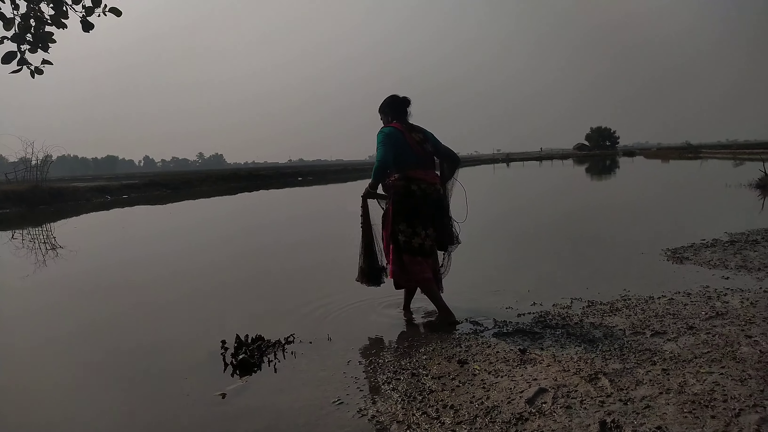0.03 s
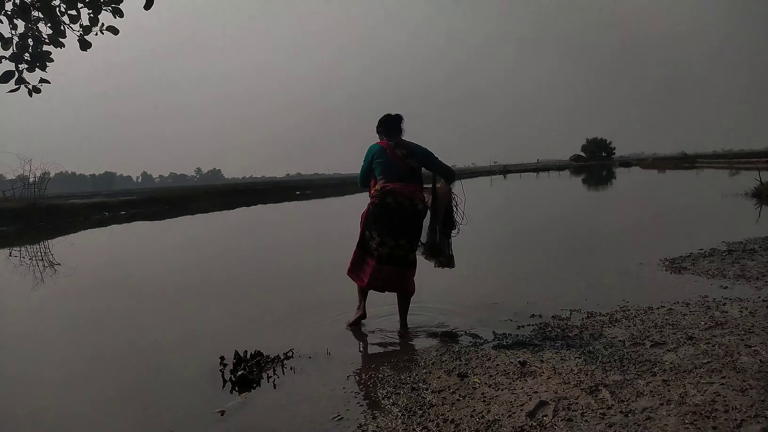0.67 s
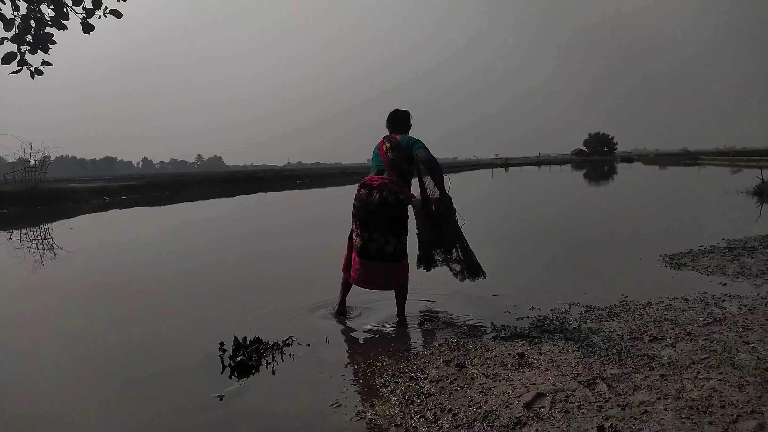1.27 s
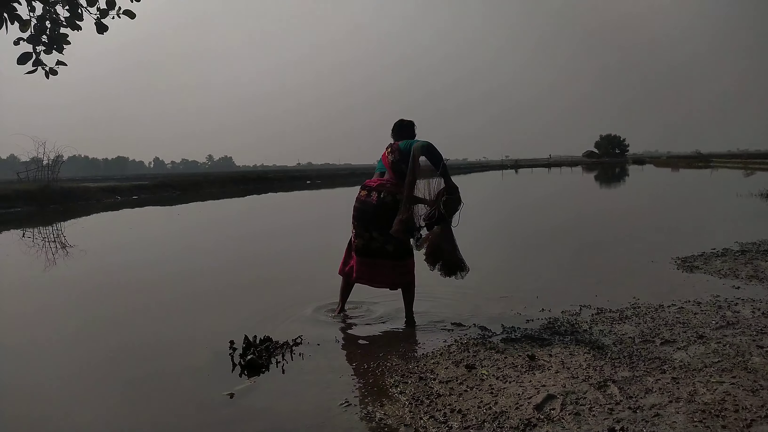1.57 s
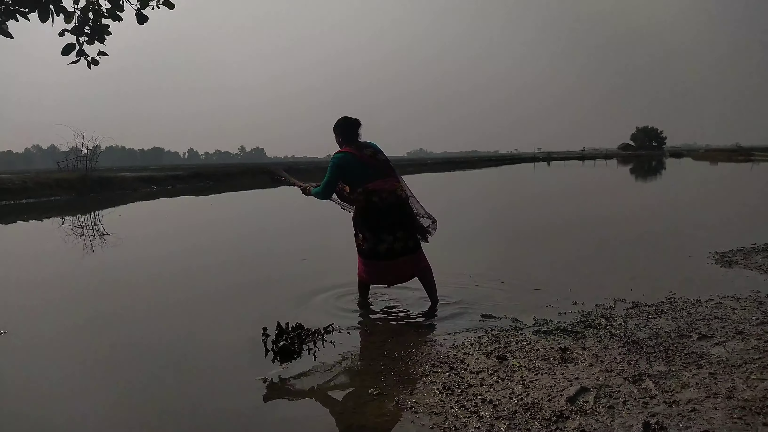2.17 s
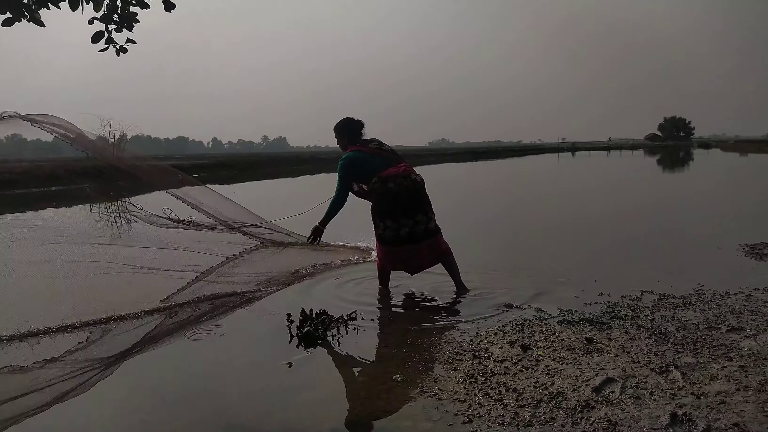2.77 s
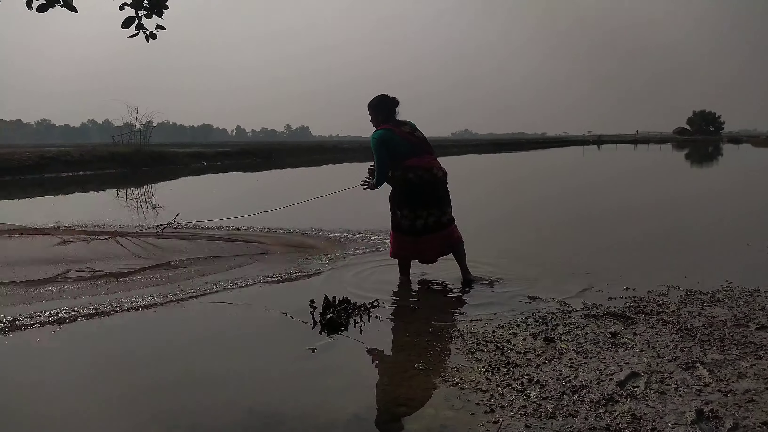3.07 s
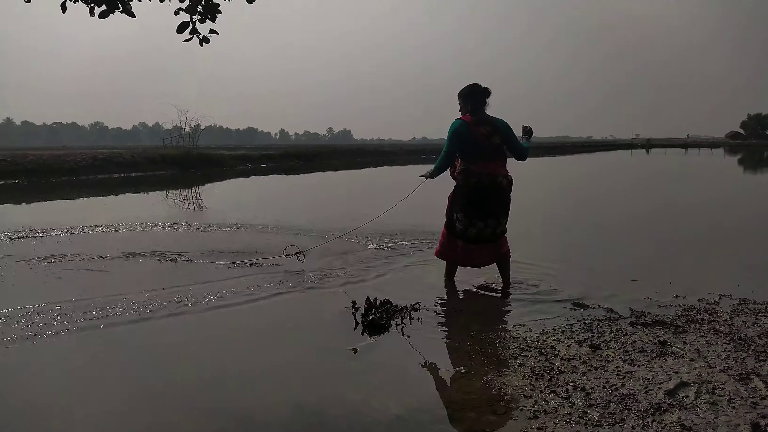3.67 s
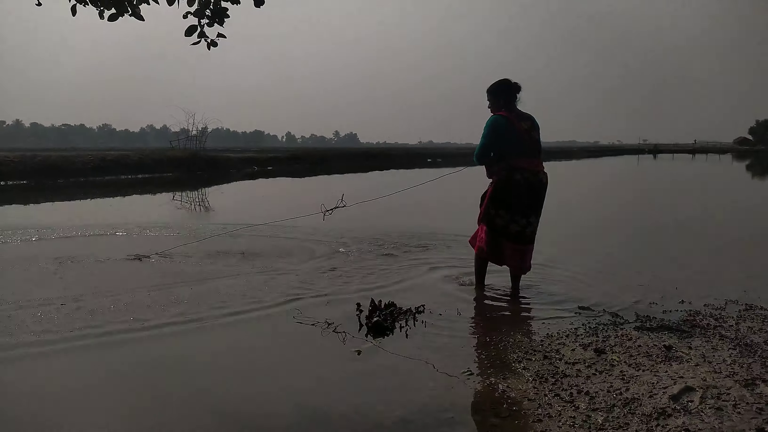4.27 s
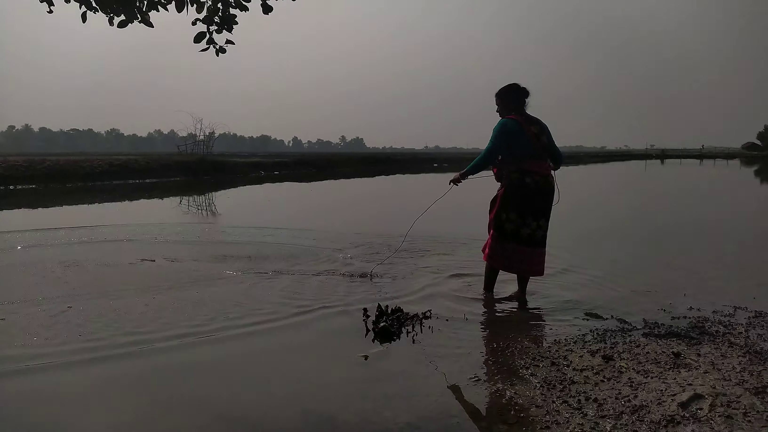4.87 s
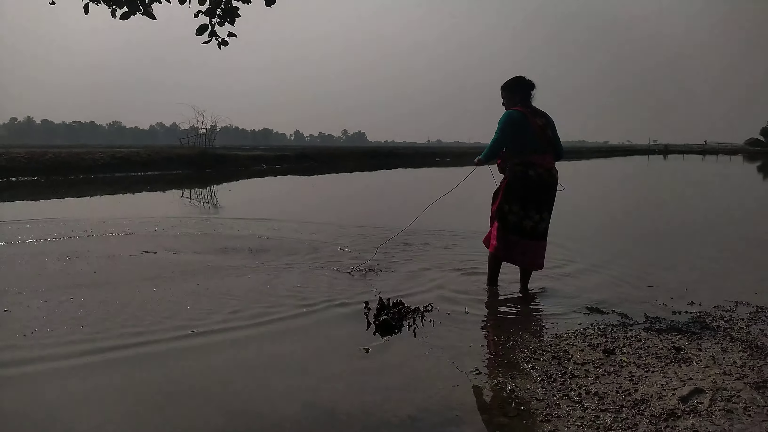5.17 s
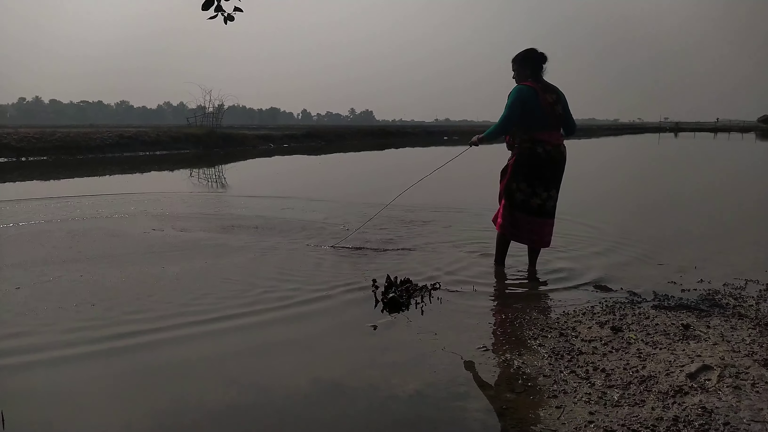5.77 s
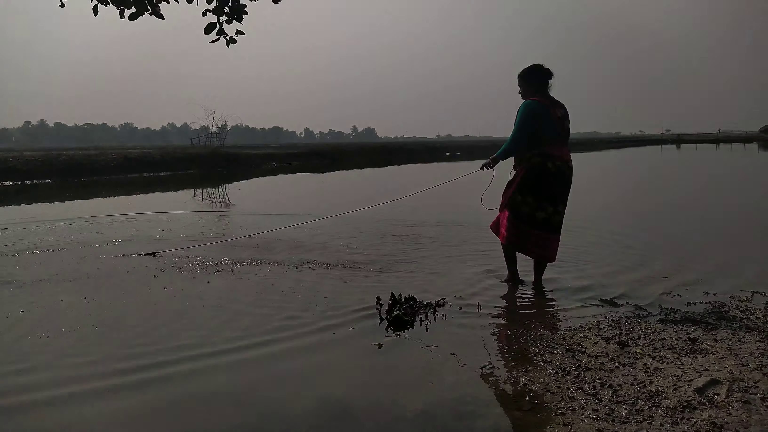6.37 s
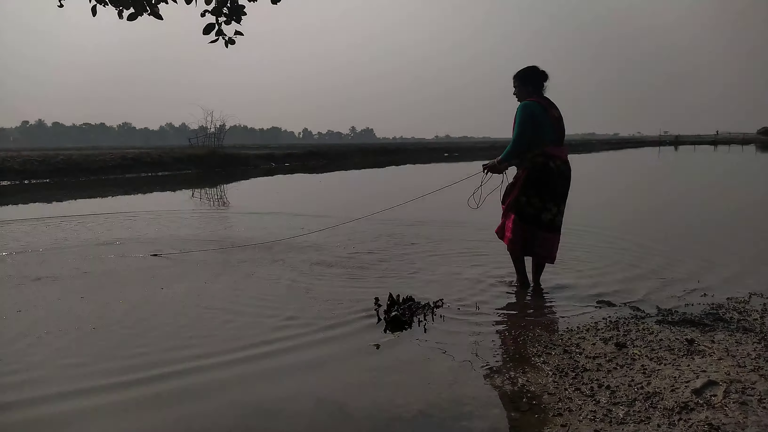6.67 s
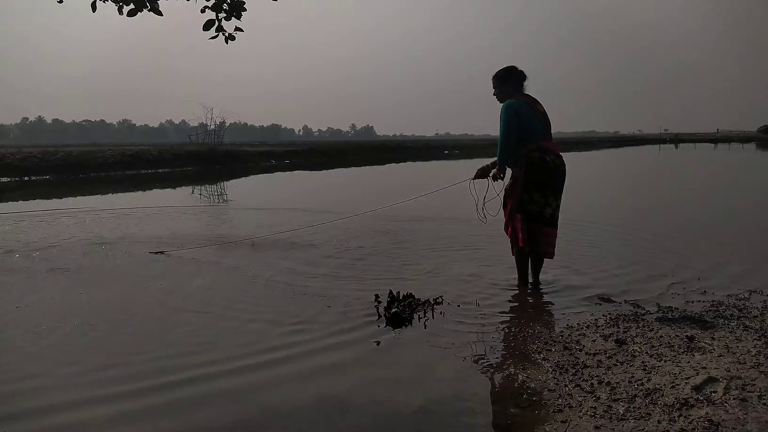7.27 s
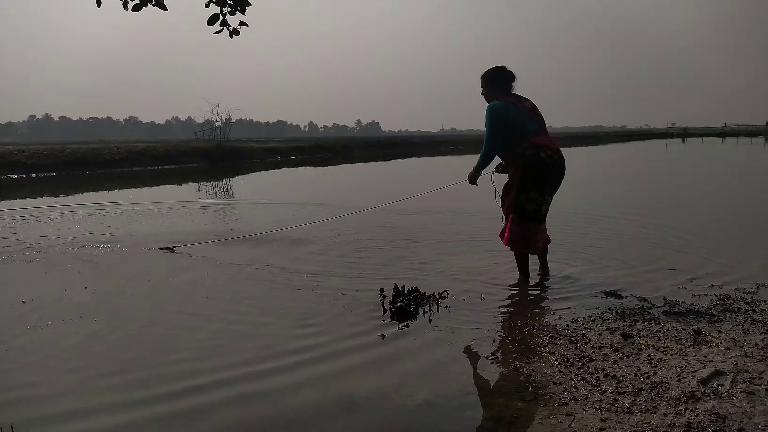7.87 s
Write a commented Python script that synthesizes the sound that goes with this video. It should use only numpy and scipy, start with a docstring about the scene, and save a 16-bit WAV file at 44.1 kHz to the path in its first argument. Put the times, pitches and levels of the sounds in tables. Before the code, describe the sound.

A bird repeats one short, falling chirp close by in quiet open air. Someone wades in the shallows with small plops while a cast net's metal weights clink. The net is swung with a bright clash, then splashes into the river, pattering and gurgling, and leaves a fading fizz. Light drips and flicks of water follow, with faint far whistles and a distant engine. One sharp click sounds close by near the end.

```python
"""A cast net is thrown into a calm river: its metal weights clink as it is gathered and swung, then
rim and mesh patter into the water, punching air pockets, raising spray and leaving a fading fizz.
The fisher wades at the muddy edge, with plops, sucking mud and flicked water. A bird repeats one
falling chirp close by; other birds whistle far off and a distant engine thuds in the open air.
Near the end comes a single sharp, bright click close by."""
import sys
import numpy as np
from scipy import signal
from scipy.fft import rfft, irfft, next_fast_len
from scipy.io import wavfile
from scipy.ndimage import uniform_filter1d

SR = 44100
rng = np.random.default_rng(int(sys.argv[2]) if len(sys.argv) > 2 else 0)


def int16_out(signal):
    """Quantize to a 16-bit WAV file."""
    q = np.round(np.clip(np.atleast_2d(signal).T, -1, 1) * 32767)
    wavfile.write(sys.argv[1], SR, q.astype(np.int16))


N = 358091
TIME = np.arange(N) / SR
LEFT_LAG_S = .000385  # source off to the right
# sound from all around, alike only in the bass: freq_hz, left_right_likeness
AMBIENT_LIKENESS = [(25, -0.2), (60, 1.1), (150, 0.67), (300, 0.6), (640, 0.2), (1400, 0.1), (3000, 0.1),
                    (7000, 0)]


def from_db(db):
    """Decibels to gain."""
    return 10 ** (np.asarray(db) / 20)


def rms_one(x):
    """Scale to rms 1."""
    return x / np.sqrt(np.mean(x ** 2) + 1e-20)


def at_bins(points):
    """Read (freq_hz, value) rows at every FFT bin."""
    hz, value = np.transpose(points)
    bins_hz = np.fft.rfftfreq(next_fast_len(N, True), 1 / SR)
    return np.interp(np.log(bins_hz + 1), np.log(hz), value)


def shaped(x, gains):
    """Apply one gain per FFT bin."""
    size = next_fast_len(N, True)
    return irfft(rfft(x, size) * gains, size)[..., :N]


def coloured(x, spectrum):
    """Filter by (freq_hz, gain_db) rows; white noise keeps its power."""
    return shaped(x, rms_one(from_db(at_bins(spectrum))))


def filtered(x, hz, kind):
    """Butterworth filter."""
    return signal.sosfilt(signal.butter(2, hz, kind, fs=SR, output="sos"), x)


def drift(rate_hz):
    """Smooth random wander, rms about 1."""
    step, settle = 40, 2000
    pole = np.exp(-2 * np.pi * rate_hz * step / SR)
    noise = rng.standard_normal(N // step + settle + 2)
    slow = signal.lfilter([1], [1, -2 * pole, pole * pole], noise)[settle:]
    return np.interp(np.arange(N) / step, np.arange(len(slow)), rms_one(slow))


def delayed(x, lag_s):
    """Fractional delay."""
    return np.interp(TIME - lag_s, TIME, x, left=0)


def add(out, start_s, sound):
    """Mix sound into out at start_s."""
    start = int(np.clip(round(start_s * SR), 0, N - 1))
    out[..., start:start + sound.shape[-1]] += sound[..., :N - start]


def decay(t60_s):
    """Exponential fall of 60 dB."""
    return from_db(-np.linspace(0, 60, max(int(t60_s * SR), 8)))


def swell(start_s, attack_s, hold_s, t60_s):
    """Envelope: linear rise, hold, exponential fall."""
    t = TIME - start_s
    return np.clip(t / attack_s, 0, 1) * from_db(-60 * np.clip((t - attack_s - hold_s) / t60_s, 0, 3))


def ring(clicks, hz, t60_s):
    """Resonator: a unit click starts a decaying unit sine."""
    radius, angle = from_db(-60 / (t60_s * SR)), 2 * np.pi * hz / SR
    return signal.lfilter([0, np.sin(angle)], [1, -2 * radius * np.cos(angle), radius ** 2], clicks + 1e-18)


def grains(per_s, spread_db):
    """Two trains of random clicks of uneven size; rms 1."""
    sizes = from_db(spread_db * np.minimum(rng.exponential(1, (2, N)), 4))
    signs = rng.choice([-1, 1], (2, N))
    return rms_one(sizes * signs * (rng.random((2, N)) < per_s / SR))


def bubbles(per_s, cycles, spread_db, band_hz, sizes):
    """Bubbles ring for some cycles, each at the pitch of its size; rms 1."""
    clicks = grains(per_s, spread_db)
    size = rng.integers(0, sizes, N)
    pitches_hz = np.geomspace(*band_hz, sizes)
    rings = (hz * ring(clicks * (size == k), hz, cycles / hz) for k, hz in enumerate(pitches_hz))
    return rms_one(sum(rings))


def scatter(x, t60_s):
    """Diffuse reflections from bank and ripples, different left and right."""
    fade = decay(t60_s)
    tail = rng.standard_normal((2, SR * 2))[:, :len(fade)] * fade[:SR * 2]
    tail /= np.sqrt(np.sum(tail ** 2) / 2)
    return signal.fftconvolve(np.atleast_2d(x), tail, axes=1)[:, :N]


def diffuse(pair, likeness):
    """Mix two unrelated signals to a left-right likeness per frequency."""
    alike = np.clip(at_bins(likeness), -.99, .99)
    mid, side = shaped(pair, np.sqrt([(1 + alike) / 2, (1 - alike) / 2]))
    return np.array([mid + side, mid - side])


def from_one_side(pair, lag_s):
    """A wide source off to one side: channels partly alike, left later."""
    # splash width: freq_hz, left_right_likeness
    likeness = [(250, 1), (600, 0.76), (1200, 0.68), (2500, 0.096), (5000, 0.037), (10000, 0.073)]
    left, right = diffuse(pair, likeness)
    return np.array([delayed(left, lag_s), right])


def open_air(level_db=-56.5):
    """Steady rumble and hush of open country."""
    # air spectrum: freq_hz, gain_db
    air_colour = [(12, -55), (20, 4.5), (50, -3), (92, -5.5), (169, -8), (337, -18.5), (497, -20.5),
                  (889, -26.5), (994, -30), (1110, -28), (2100, -30), (2410, -31.5), (3760, -35),
                  (9370, -48), (15000, -48)]
    return from_db(level_db) * diffuse(coloured(rng.standard_normal((2, N)), air_colour), AMBIENT_LIKENESS)


def far_engine(firing_hz=14.55, wander=.00593, fading_db=3, gain_db=-3):
    """Only a slow engine's low harmonics carry this far, each fading in and out."""
    # engine lines: firing_multiple, level_db
    harmonics = [(5, -60), (7, -69), (8, -63.5), (9, -67.5), (10, -61), (11, -63.5), (12, -79.5), (15, -74)]
    phase = 2 * np.pi * np.cumsum(firing_hz * (1 + wander * drift(.98))) / SR
    out = np.zeros(N)
    for multiple, db in harmonics:
        gain = from_db(db + gain_db + fading_db * drift(2.06))
        out += gain * np.sin(multiple * phase + rng.uniform(0, 2 * np.pi))
    return np.sqrt(2) * out


def far_birds(gain_db=-5, waver=.0159, flutter_db=3):
    """Thin wavering whistles swell, bend and arrive as reflections."""
    # whistles: start_s, length_s, level_db, opening_hz, middle_hz, closing_hz
    whistles = [(4.527, 0.26, -61.5, 940, 974, 977), (4.654, 0.17, -56, 2270, 2480, 2510),
                (4.824, 0.42, -66, 923, 872, 746), (4.925, 0.073, -57, 2430, 2454, 2150),
                (5.075, 0.19, -56, 2150, 2396, 2590), (5.685, 0.19, -64, 557, 883, 1110),
                (6.5, 0.084, -72, 2320, 2420, 2440), (6.628, 0.084, -66, 960, 950, 900),
                (6.751, 0.076, -63, 930, 944, 930), (6.819, 0.068, -60, 2340, 2400, 2470),
                (6.865, 0.114, -62.5, 925, 915, 870), (7.193, 0.27, -66, 1680, 1755, 1930),
                (7.138, 0.072, -61.5, 2330, 2470, 2400), (7.439, 0.06, -62, 2280, 2505, 2420),
                (7.762, 0.068, -70, 2290, 2480, 2360), (8.02, 0.39, -63, 2150, 2620, 2500)]
    out = np.zeros(N)
    wobble = 1 + waver * drift(15)
    for start_s, length_s, db, *pitches_hz in whistles:
        along = np.clip((TIME - start_s) / length_s, 0, 1)
        hz = wobble * np.polyval(np.polyfit([0, .5, 1], pitches_hz, 2), along)
        arch = np.sqrt(2 * np.abs(np.sin(np.pi * along)))
        out += from_db(db + gain_db) * arch * np.sin(2 * np.pi * np.cumsum(hz) / SR)
    return scatter(out * from_db(flutter_db * drift(60)), t60_s=.2)


def chirp(attack_s, sag_db_per_s, octave_db):
    """A whistle with a hoarse octave swoops onto a slower glide, sags and ends in a downward flick."""
    floor_hz, flick_hz_per_s = 1767, 19000
    swoop_hz, swoop_s, glide_hz, glide_s = 1400, .0048, 2122, .0561
    crest_s, end_s, end_t60_s = .025, .087, .036
    t = np.arange(SR // 7) / SR
    ending_s = np.maximum(t - end_s, 0)
    swoop = swoop_hz * swoop_s * (1 - np.exp(-t / swoop_s))
    glide = glide_hz * glide_s * (1 - np.exp(-t / glide_s))
    phase = 2 * np.pi * (floor_hz * t + swoop + glide - flick_hz_per_s * ending_s ** 2 / 2)
    rasp = rms_one(uniform_filter1d(rng.standard_normal(len(t)), size=110))
    octave = from_db(octave_db - 2.5) * rms_one(1 + .9 * rasp) * np.sin(2 * phase)
    fundamental = from_db(-sag_db_per_s * np.maximum(t - crest_s, 0)) * np.sin(phase)
    envelope = np.minimum(t / attack_s, 1) ** 3 * from_db(-60 * ending_s / end_t60_s)
    return np.sqrt(2) * envelope * (fundamental + octave)


def near_bird(gain_db=.95, rough_db=2.6, water_gain=.57, left_db=-.8):
    """Chirps beat with their reflection off the water; leaves blur them, the far bank returns a pip."""
    # calls, faint ones from a second bird: start_s, level_db, attack_s, sag_db_per_s, octave_db
    calls = [(0.1903, -40.5, 0.0068, 201, -33), (0.486, -42, 0.005, 144, -29),
             (0.8013, -41, 0.0049, 177, -45), (1.066, -72, .006, 215.5, -46),
             (1.138, -40, 0.0068, 198, -30), (1.5559, -40.5, 0.0059, 190, -39),
             (1.8735, -39.5, 0.0049, 235, -28), (2.1823, -40.5, 0.005, 245, -43),
             (2.5107, -40.5, 0.0065, 254, -56), (3.3338, -40.5, 0.0066, 182, -43),
             (3.653, -41, 0.0053, 163, -43), (3.9462, -39, 0.0047, 230, -25.5),
             (4.266, -39, 0.0045, 229, -36), (4.5846, -39, 0.0053, 220, -33),
             (5.015, -40.5, 0.0033, 243, -28), (5.234, -73, .006, 300, -41),
             (5.3242, -41, 0.0046, 194, -32), (5.6279, -40.5, 0.0044, 191, -23),
             (6.239, -40.5, 0.0044, 215.5, -26), (6.5422, -39, 0.0044, 200, -31),
             (6.8458, -40, 0.0042, 224, -26), (7.1605, -39.5, 0.0036, 221, -27),
             (7.2, -54, 0.014, 114, -43), (7.998, -69.5, .006, 300, -46)]
    # water reflection, sooner once the listener has moved: time_s, lag_s
    water_lag = [(2.6, .00217), (3.3, .00205)]
    # scatter off leaves: freq_hz, gain_db
    leaf_colour = [(1900, -8), (2350, -5.5), (2900, 1), (3400, 2), (4100, 0), (5000, -6)]
    # bank echo, growing clearer: time_s, gain_db
    echo_levels = [(0, -42), (4.5, -35), (5.5, -28), (8.12, -27)]
    direct = np.zeros(N)
    for start_s, db, *shape in calls:
        add(direct, start_s, from_db(db + gain_db) * chirp(*shape))
    reflection = water_gain * delayed(direct, np.interp(TIME, *np.transpose(water_lag)))
    song = (direct + reflection) * from_db(rough_db * drift(240))
    panned = np.array([from_db(left_db) * delayed(song, LEFT_LAG_S), song])
    leafy = shaped(song, from_db(at_bins(leaf_colour)))
    blur = from_db(-9.8) * scatter(delayed(leafy, lag_s=.006), t60_s=.26)
    tail = from_db(-21) * scatter(leafy, t60_s=.91) * drift(88)
    pip = delayed(filtered(song, [2780, 3120], "band"), lag_s=.508)
    echo = from_db(np.interp(TIME, *np.transpose(echo_levels))) * pip
    return panned + blur + tail + echo


def fizz(gain_db=-6, flicker_db=2.13, foam_db=-45.5, trickle_db=-68):
    """Foam bursts and dies away; drips and tiny bubbles keep ticking under the wet net and rope."""
    # showers off net and rope: start_s, attack_s, t60_s, level_db
    showers = [(.15, 0.069, 13, -61.5), (0.717, 0.14, 0.27, -52), (.842, 0.014, 0.2, -49),
               (1.5, 0.061, 4.6, -58), (1.555, 0.016, 0.16, -50), (1.712, 0.017, 0.16, -57),
               (1.9, 0.12, 0.84, -49.5), (2.24, 0.058, 1.5, -46.5), (2.42, 0.003, 0.1, -53),
               (4.45, 0.31, 2, -53.5), (5.72, 0.056, 5.4, -55.5)]
    # fizz spectrum: freq_hz, gain_db
    fizz_colour = [(500, -16), (1200, -8), (2500, -3), (4000, -13.5), (5800, -4), (6800, -7), (8300, -1),
                   (9400, 3), (10500, -8.5), (15500, -21.5)]
    foam = from_db(foam_db) * swell(start_s=2.13, attack_s=1, hold_s=0, t60_s=7.33)
    power = from_db(trickle_db) ** 2 + foam ** 2
    for start_s, attack_s, t60_s, db in showers:
        power += (from_db(db) * swell(start_s, attack_s, 0, t60_s)) ** 2
    envelope = np.sqrt(power) * from_db(gain_db + flicker_db * drift(18.3))
    ticks = from_db(-12) * bubbles(per_s=90, cycles=45, spread_db=2, band_hz=(3500, 11000), sizes=14)
    return envelope * coloured(grains(per_s=15000, spread_db=1) + ticks, fizz_colour)


def sharp_ticks(band_ratio=1.12, wet_db=-12):
    """Short sharp ticks, mostly near 5 kHz, probably the net's weights clicking."""
    # ticks: start_s, peak_db, centre_hz, t60_s
    ticks = [(0.7824, -38, 5340, 0.015), (0.845, -36, 4700, 0.0078), (0.852, -36, 5160, 0.0076),
             (0.861, -36, 5360, 0.0058), (0.8667, -38, 5200, 0.015), (0.874, -33, 5400, .007),
             (.943, -48, 4730, 0.011), (.963, -41, 4600, .012), (1.5095, -43.5, 4700, .012),
             (1.5555, -47, 1700, 0.026), (1.5745, -43, 5170, .008), (1.602, -44, 5160, .01),
             (7.614, -39, 4670, .016), (7.617, -39, 8350, .012)]
    out = np.zeros(N)
    t = np.arange(SR // 10) / SR
    for start_s, db, hz, t60_s in ticks:
        noise = rng.standard_normal(len(t)) * from_db(-60 * np.minimum(t / t60_s, 3))
        burst = filtered(noise, [hz / band_ratio, hz * band_ratio], "band")
        add(out, start_s, from_db(db) * burst / np.abs(burst).max())
    return out + from_db(wet_db) * scatter(out, t60_s=.091)


def wading(gain_db=1, plop_bend=.226, suck_bend=-.65, wet_db=-6):
    """Air pockets gurgle and rise in pitch as they surface; sucking mud falls in pitch."""
    # air pockets and drips at the feet and under the net: start_s, level_db, pitch_hz, t60_s
    plops = [(.272, -56.5, 770, 0.24), (0.38, -47, 1336, 0.055), (0.39, -48, 1800, 0.02),
             (0.408, -51.5, 1110, 0.07), (.76, -59, 1500, 0.12), (.856, -47.5, 570, 0.047),
             (1.474, -51.5, 4050, 0.014), (1.512, -37.5, 1420, 0.02), (1.547, -53, 1230, .044),
             (1.592, -47.5, 1480, .07), (2.678, -25, 1064, 0.097), (2.833, -31.5, 464, 0.045),
             (2.84, -40, 352, 0.089), (2.94, -42, 330, 0.08), (3.04, -36, 327, 0.057),
             (2.857, -41, 845, 0.11), (3.051, -28.5, 810, 0.045), (3.055, -30.5, 438, 0.052),
             (3.123, -32, 1780, 0.033), (3.247, -32, 595, 0.036), (3.478, -36, 845, 0.053),
             (3.559, -27, 850, 0.022), (3.57, -37, 2260, 0.027), (3.634, -42, 1890, 0.036),
             (4.272, -56, 820, 0.046), (4.993, -48.5, 796, 0.034), (5.556, -57, 640, 0.037),
             (5.356, -44.5, 1175, 0.032), (5.357, -51, 610, 0.028), (5.819, -44, 1310, 0.032),
             (6.071, -52, 1470, 0.031), (6.684, -46.5, 9060, 0.017), (6.754, -49, 8800, 0.015),
             (7.026, -55, 7700, 0.0092), (7.617, -49.5, 8400, 0.045), (7.6148, -40.5, 2940, 0.029),
             (7.625, -55, 1930, 0.023), (7.642, -47, 3140, 0.029)]
    # mud at a lifted foot: start_s, level_db, pitch_hz, t60_s
    sucks = [(.729, -59, 2190, 0.081), (0.787, -47, 2000, 0.022), (.812, -58, 1275, .04),
             (.852, -56, 1250, 0.03), (1.45, -56, 1080, .04)]
    out = np.zeros(N)
    gurgle = 1 + .5 * drift(210)
    for events, bend in (plops, plop_bend), (sucks, suck_bend):
        for start_s, db, hz, t60_s in events:
            fade = decay(t60_s)
            cycles = np.cumsum(hz * (1 + bend * np.linspace(0, 1, len(fade)))) / SR
            onset = np.minimum(cycles / 2, 1)
            add(out, start_s, from_db(db + gain_db) * onset * fade * np.sin(2 * np.pi * cycles))
    out *= gurgle
    return out + from_db(wet_db) * scatter(out, t60_s=.023)


def flicked_water(gain_db=16):
    """Water flicked by a foot, a weight or the rope lands with a snap and a short crackle."""
    # flicks: start_s, level_db
    flicks = [(0.121, -54.5), (0.381, -63), (.414, -50), (.704, -48.5), (.749, -53), (.7735, -45.5),
              (.811, -58), (0.845, -39), (0.873, -40), (0.9425, -38.5), (1.509, -55), (1.556, -46),
              (1.574, -47), (2.6094, -36), (2.653, -41), (2.756, -39), (2.868, -34), (2.9, -30),
              (3.1888, -24), (3.424, -36), (3.502, -29.5), (3.836, -45), (4.3153, -43), (4.7305, -48),
              (4.7517, -50), (4.8272, -47), (5.292, -48), (5.311, -43), (5.3213, -40.5), (5.356, -55),
              (5.817, -49), (5.9092, -47.5), (6.0734, -67), (6.683, -59), (7.6132, -45)]
    # flick spectrum: freq_hz, gain_db
    flick_colour = [(300, -47), (1200, -6.5), (3000, 7), (4000, 2), (5400, 2), (6800, 0), (8900, 10.5),
                    (11000, -2.5), (15500, -21)]
    impulses = np.zeros(N)
    for start_s, db in flicks:
        add(impulses, start_s, from_db([db + gain_db]))
    crackle = scatter(impulses, t60_s=.3)
    snap = scatter(impulses, t60_s=.027)
    return diffuse(coloured(crackle + snap, flick_colour), AMBIENT_LIKENESS)


def weight_ring(contacts, size_spread=.03):
    """Contacts ring the modes of a metal weight; no two weights are quite the same size."""
    # modes: pitch_hz, level_db, t60_s
    modes = [(5200, -11, .006), (6100, -8, .008), (7700, -7, .012), (8250, 0, .022), (8600, 0, .022),
             (9300, -3, .012), (12500, -16, .004), (15000, -17, .004)]
    t = np.arange(SR // 20) / SR
    response = np.zeros(len(t))
    for hz, db, t60_s in modes:
        fade = from_db(db - 60 * t / t60_s + 2 * rng.normal())
        response += fade * np.sin(2 * np.pi * hz * (1 + size_spread * rng.normal()) * t)
    return signal.fftconvolve(contacts, [response / np.sqrt(np.sum(response ** 2))], axes=1)


def net_weights(knock_db=-2.5, rattle_db=-16.5):
    """Each knock shakes its neighbours into a rattle; in the throw the chain clashes, hard and bright."""
    # weights clinking; last row, a single sharp, bright click close by: start_s, level_db
    clinks = [(0.462, -40.5), (0.7105, -37), (0.7308, -50.5), (0.739, -41.5), (.7825, -49), (.8445, -41),
              (.853, -39), (.8627, -34), (.8755, -43), (.9425, -53), (.9633, -47), (1.272, -27),
              (1.2835, -35.5), (1.3468, -33.5), (1.3595, -50), (1.4055, -48), (1.5723, -48), (1.644, -43),
              (1.656, -39), (1.704, -33), (1.724, -46), (1.734, -36), (1.7714, -40), (1.928, -37.5),
              (1.95, -35), (1.9667, -37), (1.9832, -37), (1.9894, -24.5), (2.0004, -40), (2.024, -26.5),
              (2.0293, -26), (2.101, -42), (2.216, -39.5), (2.229, -42), (2.427, -33), (2.4285, -44),
              (2.4315, -31), (2.442, -34), (7.6141, -49)]
    # clashes in the throw; last row, the treble of that click: start_s, level_db, t60_s, lowpass_hz
    bright_bursts = [(2.2755, -33, .02, 17000), (2.278, -30, .014, 13000), (2.2825, -36, .07, 15000),
                     (2.3183, -21.5, .01, 19000), (2.3228, -26.5, .016, 19000), (2.3275, -33.5, .04, 17000),
                     (2.334, -34, .13, 14000), (2.4245, -38.5, .16, 13000), (7.6146, -38.5, .007, 19000)]
    # contact spectra: freq_hz, gain_db
    clink_colour = [(1500, -60), (3300, -15), (4800, 12.5), (5600, 16), (6800, 11), (8500, 17),
                    (9800, 20.5), (12000, 3), (15500, -10)]
    clash_colour = [(1500, -42), (3300, -12), (4800, 6), (6800, 6), (8400, 32.5), (10000, 25), (12000, 23),
                    (14000, 20), (15000, 22), (15800, 31)]
    knocks, clashes, rings = np.zeros((3, 2, N))
    dense = rng.standard_normal((2, N))
    loose = grains(per_s=3000, spread_db=2.5)

    def hit(out, texture, start_s, db, t60_s, ring_db):
        """Add a burst of contacts to out and its metal ring to rings."""
        fade = decay(t60_s)
        start = int(start_s * SR)
        contacts = from_db(db) * fade * texture[:, start:start + len(fade)]
        add(out, start_s, contacts)
        add(rings, start_s, from_db(ring_db) * weight_ring(contacts))

    for start_s, db in clinks:
        hit(knocks, dense, start_s, db + knock_db, t60_s=.0046, ring_db=-8)
    for start_s, db in clinks:
        hit(knocks, loose, start_s, db + rattle_db, t60_s=.12, ring_db=-8)
    for start_s, db, t60_s, lowpass_hz in bright_bursts:
        hit(clashes, filtered(dense, lowpass_hz, "low"), start_s, db, t60_s, ring_db=0)
    return coloured(knocks, clink_colour) + coloured(clashes, clash_colour) + filtered(rings, 3800, "high")


def water_slaps(gain_db=3.5):
    """Water slapped by the net or stirred by a foot: decaying bursts of dense clicks."""
    # slaps: start_s, level_db, t60_s
    slaps = [(.27, -70, .4), (0.379, -55.5, 0.14), (.725, -64.5, 0.7), (0.81, -49.5, 0.047),
             (0.849, -54.5, 0.18), (0.944, -60, 0.045), (1.511, -59, 0.056), (1.545, -59, 0.23),
             (2.65, -42, 0.96), (2.677, -34.5, 0.059), (2.687, -35.5, 0.049), (2.819, -37, 0.53),
             (3.226, -44, 0.091), (3.47, -37.5, 0.092), (3.554, -69, 0.41), (5.312, -65.5, 1),
             (5.355, -67, 0.047), (5.557, -61.5, .05), (5.818, -63, 0.046), (5.937, -64.5, 1),
             (6.07, -54, 0.044), (7.614, -53, 0.043)]
    # slap spectrum: freq_hz, gain_db
    slap_colour = [(250, -25), (550, 3.5), (800, 10), (1100, 13), (1600, 14.5), (2400, 5), (4000, 2.5),
                   (8500, 1), (14000, -14)]
    envelope = np.zeros(N)
    for start_s, db, t60_s in slaps:
        add(envelope, start_s, from_db(db + gain_db) * decay(t60_s))
    return coloured(envelope * grains(per_s=9000, spread_db=2), slap_colour)


def net_splash(surge_db=-.13, churn_lag_s=.0094):
    """The mesh raises a fine spray; the weights punch air pockets that ring a moment later."""
    # rim, spread mesh and last folds landing: start_s, attack_s, hold_s, t60_s, churn_db, spray_db
    landings = [(2.592, 0.016, 0.23, 0.15, -54.5, -46), (2.754, 0.085, 0.4, 0.065, -38, -40),
                (3.162, 0.11, 0.25, 0.81, -45, -47)]
    # churned water and spray spectra: freq_hz, gain_db
    churn_colour = [(150, -33), (280, -26), (450, -3), (850, 0.5), (1400, -2.5), (2200, 4.5), (2700, -3.5),
                    (3400, -46), (6000, -38)]
    spray_colour = [(1200, -14.5), (2500, -5), (3500, -7.5), (5800, 0.5), (6800, -6.5), (8300, -0.5),
                    (9400, 2.5), (10500, -8), (12500, -14.5), (15500, -26)]
    surge = from_db(surge_db * drift(40))
    pockets = bubbles(per_s=850, cycles=42, spread_db=2.3, band_hz=(330, 3000), sizes=48)
    patter = coloured(grains(per_s=2800, spread_db=3.2), churn_colour)
    churn = from_db(-1) * rms_one(coloured(pockets, churn_colour)) + from_db(-4.5) * patter
    mist = grains(per_s=5000, spread_db=-.5)
    droplets = bubbles(per_s=420, cycles=32, spread_db=2, band_hz=(2800, 12000), sizes=18)
    spray = coloured(mist + from_db(-3.5) * droplets, spray_colour)
    churn_gain, spray_gain = np.zeros((2, N))
    for start_s, *shape, churn_db, spray_db in landings:
        churn_gain += from_db(churn_db) * swell(start_s + churn_lag_s, *shape)
        spray_gain += from_db(spray_db) * swell(start_s, *shape)
    body = from_one_side(surge * churn_gain * churn + water_slaps(), lag_s=.00019)
    return body + from_one_side(surge * spray_gain * spray, LEFT_LAG_S)


def scene():
    """The fisher's sounds with a faint return from the bank, among birds and distant noise."""
    fisher = net_weights() + net_splash() + wading() + flicked_water() + sharp_ticks()
    bank = from_db(-20) * scatter(fisher, t60_s=.7)
    return fisher + bank + fizz() + near_bird() + far_birds() + far_engine() + open_air()


def record(dry, cutoff_hz=16250):
    """Colour each channel and cut the top."""
    # channel balance: freq_hz, left_minus_right_db
    balance = [(60, -.5), (400, -0.8), (700, -0.5), (1300, 3), (2400, 4), (4400, 3), (6300, 3),
               (8300, -10.5), (11000, 0), (15000, -1)]
    gains = from_db(at_bins(balance) * np.array([[.5], [-.5]]))
    heard = shaped(dry, gains / np.sqrt(np.mean(gains ** 2, axis=0)))
    return signal.sosfilt(signal.ellip(10, .1, 70, cutoff_hz, fs=SR, output="sos"), heard)


dry = scene()
out = record(dry)
int16_out(out)
```